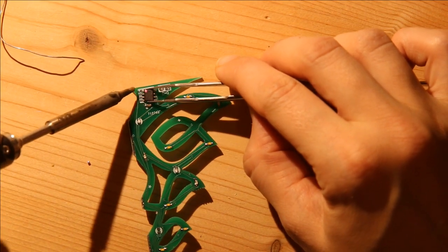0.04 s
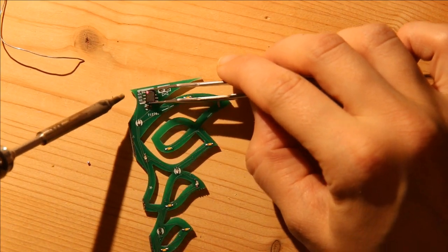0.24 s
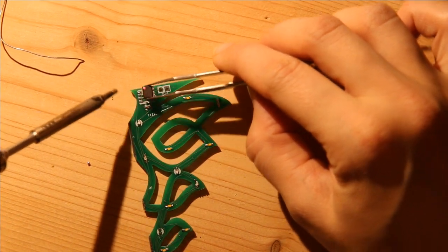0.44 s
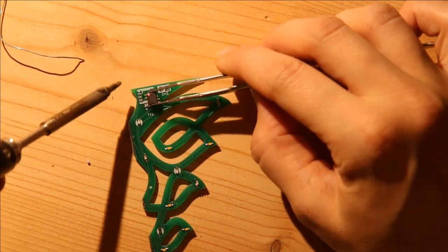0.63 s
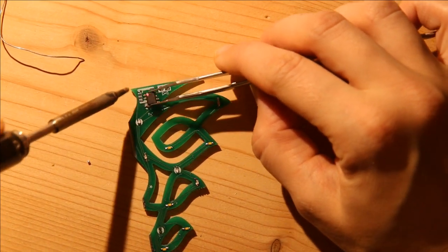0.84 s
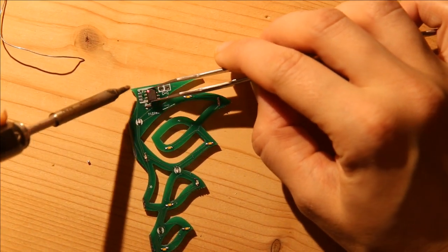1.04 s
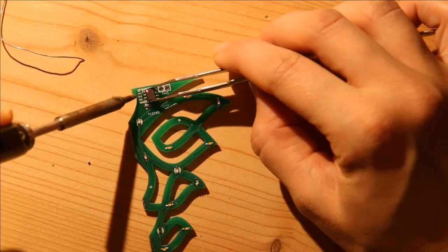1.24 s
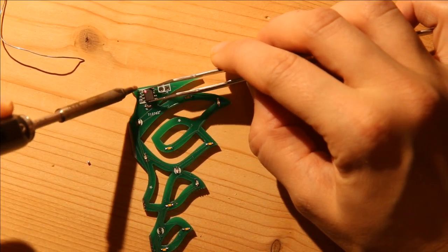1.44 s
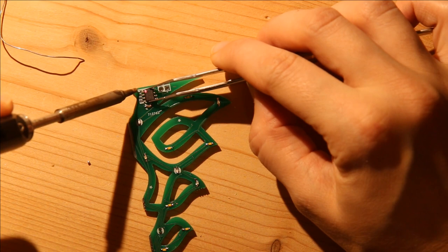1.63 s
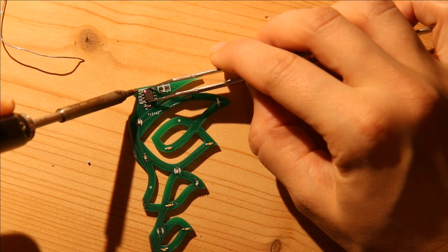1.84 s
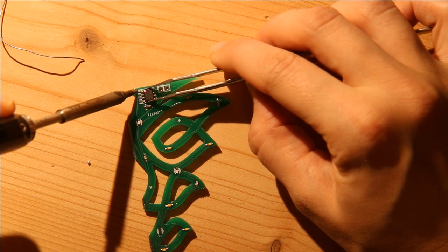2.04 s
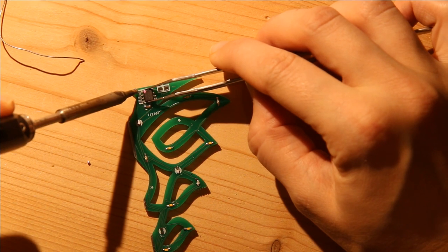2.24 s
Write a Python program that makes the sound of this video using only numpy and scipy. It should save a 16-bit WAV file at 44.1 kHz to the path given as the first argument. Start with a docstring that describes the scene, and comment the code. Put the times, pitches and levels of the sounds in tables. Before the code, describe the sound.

A small metal tool drops on a wooden table with a quick, sharp clatter. Hands and tools then slide softly over the wood, with one knock and a run of light taps, heard close in a small quiet room.

```python
"""Soldering at a wooden table in a small quiet room, heard close by through a two-port camera microphone.
After two faint knocks, a tool drops at 0.25 s: its quick impacts excite the modes of the table top and
its own short, high ones. Hands and tools then slide over the wood in a few strokes, friction making a
hiss and ringing the table. A knock follows just after 1 s, and a run of light taps from 1.75 s to the
end. A low, unsteady rumble lies under it all."""
import sys
import numpy as np
from scipy import signal
from scipy.fft import rfft, irfft
from scipy.io import wavfile
from scipy.ndimage import uniform_filter1d

SR = 44100
rng = np.random.default_rng(int(sys.argv[2]) if len(sys.argv) > 2 else 0)


def persist_wave(psi):
    """Save psi, clipped to +-1, as 16-bit WAV."""
    counts = np.round(np.clip(psi, -1, 1) * 32767).astype(np.int16)
    wavfile.write(sys.argv[1], SR, np.atleast_2d(counts).T)


N = 101430

# Blows on the table. Each row: time in seconds, level in dB, contact time (rise to peak force) in ms,
# pitch region of the struck spot in Hz.
BLOWS = [(0.021, -40.5, 1.6, 310), (0.21, -36.5, 1.1, 305), (0.2468, -6.5, 0.21, 866),
         (0.2501, -5, 0.19, 1600), (0.2538, -20.5, 0.2, 498), (0.2572, -14.5, 0.5, 900.7),
         (0.263, -4.5, 0.6, 764), (0.2685, -6, 0.21, 1290), (0.2707, -3, 0.089, 1230),
         (0.2727, -2.5, .35, 1260), (0.2791, -8, 0.19, 1216), (0.2837, -10.5, 0.29, 1290),
         (0.293, -8, .35, 1429), (0.2971, -24, 1.5, 795), (0.3173, -25, 0.44, 894),
         (1.0501, -25.5, 0.63, 450), (1.059, -37.5, 0.47, 500), (1.066, -46.5, 0.77, 400),
         (1.0958, -36.5, 0.32, 1080), (1.2906, -38, 0.44, 1800), (1.754, -47, 1.35, 490),
         (1.799, -40, 2.05, 196.2), (1.845, -42, 1.6, 500), (1.893, -31, 0.74, 270),
         (1.9164, -23, 0.48, 622), (1.93, -44, 0.75, 605), (1.971, -34.5, 0.54, 444),
         (1.994, -38, 0.66, 371), (2.042, -35, 1.02, 318), (2.065, -48.5, 2.8, 254),
         (2.136, -37.5, 0.46, 683.4), (2.1638, -33.5, 1.1, 316), (2.2415, -40, 0.72, 870),
         (2.248, -34, 0.48, 632), (2.265, -43, 1.2, 410)]
MODE_SCATTER_DB, PITCH_SCATTER, KNOCK_TOP_HZ = 2.5, .012, 4200
LIGHT_BELOW_DB, LIGHT_DB_PER_OCT2, FIRM_DB_PER_OCT2 = -21, 11, 6.5
TICK_AT_S, TICK_DB, TICK_HZ, TICK_DECAY_S = .2495, -30, 12030, .0025

def knocks():
    """Impact excitation: a force pulse rings the modes near its spot's pitch; light taps wake fewer."""
    out, t = np.zeros(N + SR), np.arange(512) / SR
    mode_hz = np.array(TABLE_MODES)[:, 0]
    chance = rng.standard_normal((len(BLOWS), 2, len(TABLE_MODES)))
    for (s, db, contact_ms, spot_hz), (scatter, detune) in zip(BLOWS, chance):
        since = t - s * SR % 1 / SR  # timed finer than one sample
        force = np.exp(-((since / (contact_ms / 1000) - 1) * 3) ** 2)
        falloff = LIGHT_DB_PER_OCT2 if db < LIGHT_BELOW_DB else FIRM_DB_PER_OCT2
        spot_db = MODE_SCATTER_DB * scatter - falloff * np.log2(mode_hz / spot_hz) ** 2
        blow = signal.fftconvolve(table_ring(spot_db, PITCH_SCATTER * detune, damping=1.0), force)
        i = int(s * SR - contact_ms / 2000 * SR)
        out[i:i + len(blow)] -= undb(db) * blow / np.abs(blow).max()
    out = signal.sosfilt(butter(6, KNOCK_TOP_HZ), out)
    tick = rng.standard_normal(len(t)) + np.sin(2 * np.pi * TICK_HZ * t)  # one bright tick in the clatter
    i = int(TICK_AT_S * SR)
    out[i:i + len(t)] += undb(TICK_DB) * tick * np.exp(-t / TICK_DECAY_S)
    return out[:N]


# Modes of the table top. Each row: frequency in Hz, relative level in dB.
TABLE_MODES = [(135, -6), (190, -7), (245, -5), (315, 1), (395, -1), (506, -8), (550, 0), (636, -3),
               (730, -1), (800, -5), (997, -3), (1255, 1), (1355, -2), (1650, 8), (1970, 10), (2430, -2),
               (2800, -5)]
RING_CYCLES, RING_REFERENCE_HZ, DAMPING_TILT, SWELL_CYCLES = 24, 315, .15, .5

def table_ring(gain_db, detune, damping):
    """Modal superposition: the impulse response sums damped sines; higher ones die in fewer cycles."""
    hz, db = np.array(TABLE_MODES).T[:, :, None]
    cycles = hz * (1 + detune[:, None]) * np.arange(SR // 6) / SR
    loss = damping / RING_CYCLES * (hz / RING_REFERENCE_HZ) ** DAMPING_TILT
    fade = np.exp(-np.log(1000) * loss * cycles)
    swell = 1 - np.exp(-cycles / SWELL_CYCLES)
    return np.sum(undb(db + gain_db[:, None]) * fade * swell * np.sin(2 * np.pi * cycles), 0)


# Modes of the dropped tool. Each row: frequency in Hz, relative level in dB.
TOOL_MODES = [(2960, 1), (3570, 1), (4210, -2.5), (4620, -11)]
# Its bounces. Each row: start in seconds, level in dB.
TOOL_BOUNCES = [(0.2473, -20.5), (.2503, -17), (0.2612, -23.5), (0.2712, -22), (.279, -23.5),
                (.2853, -26.5)]
TOOL_ATTACK_S, TOOL_T60_S = .0003, .014

def dropped_tool():
    """Free vibration: each hard bounce leaves the tool ringing briefly in its own high modes."""
    out, t = np.zeros(N), np.arange(1024) / SR
    hz, db = np.array(TOOL_MODES).T[:, :, None]
    envelope = (1 - np.exp(-t / TOOL_ATTACK_S)) * np.exp(-np.log(1000) * t / TOOL_T60_S)
    for s, level_db in TOOL_BOUNCES:
        strength = undb(db + MODE_SCATTER_DB * rng.standard_normal(db.shape))
        clink = envelope * np.sum(strength * np.sin(2 * np.pi * hz * t), 0)
        i = int(s * SR)
        out[i:i + len(t)] += undb(level_db) * clink / np.abs(clink).max()
    return out


# Strokes over the wood, one list each. Each row: time in seconds, level in dB, then the treble and the
# table's ring in dB relative to that level.
STROKE_LEVELS = [
    [(.25, -40, -4.5, 17), (.3, -45, -18, -14.5), (.368, -47.5, -14, -2), (.41, -36, -12.5, -9),
     (.446, -35, -6, -10), (.55, -33.5, -8.5, -13.5), (.6, -45.5, -8.5, -6)],
    [(.6, -45, -6.5, -6.5), (.68, -47, -9.5, -5), (.792, -44, -12, -8.5), (.852, -40, -7, -7.5),
     (.938, -40, -7.5, -3), (.98, -40.5, -10.5, -8), (1.0, -56, -6, -13), (1.04, -86, -3.5, 2.5)],
    [(1.265, -81, -21.5, -9), (1.29, -62.5, -22, 7), (1.33, -68, -13, 3), (1.361, -88, -10, 7),
     (1.4, -61, -6, 1.5), (1.46, -49.5, -14, -9.5), (1.507, -44.5, -10, -5), (1.549, -60.5, -8.5, -9),
     (1.59, -111.5, -6, -13)],
    [(1.88, -81, -26, 4), (1.92, -69.5, -9.5, 0), (1.976, -81, -19, 5), (2.01, -86.5, -4, 11)],
]
# Spectra of the rubbing's body and treble, for the first stroke and the later ones.
# Each row: frequency in Hz, relative spectral density in dB.
FIRST_BODY = [(100, -33), (150, -5.5), (235, -24), (391, 3), (456, -8.5), (713, -4), (1430, -4.5),
              (1670, -12.5), (2530, 2.5), (6000, -12), (7800, -52)]
FIRST_TREBLE = [(4000, 0.5), (5570, -6), (6720, -7), (9300, -10.5), (10300, -13), (11300, -24),
                (13400, -18.5), (15600, -21.5)]
LATER_BODY = [(88, -39.5), (150, -5), (524, -6), (691, 3), (807, -19), (1050, -3.5), (1360, -5.5),
              (1910, -10), (3890, -3.5), (4470, -12.5), (6000, -11.5), (7800, -39.5)]
LATER_TREBLE = [(4000, 0.5), (5200, -12.5), (6300, -5.5), (7100, -9.5), (8350, -17.5), (9790, -10.5),
                (11600, -22.5), (13600, -19), (15600, -20.5)]
TREBLE_SPLIT_HZ, FLUTTER_DB, RUB_DAMPING = 4600, 1.2, 0.68

def strokes():
    """Sliding friction: tiny catches hiss and ring the table. Returns shared, left and right parts."""
    t, out = np.arange(N) / SR, np.zeros((3, N))
    split, midband = butter(3, TREBLE_SPLIT_HZ), butter(4, [1000, 4000], "band")
    flat = np.zeros(len(TABLE_MODES))
    response = table_ring(gain_db=flat, detune=flat, damping=RUB_DAMPING)

    def unit_midband(x):
        return x / np.std(signal.sosfilt(midband, x))

    for n, rows in enumerate(STROKE_LEVELS):
        body_colour, treble_colour = (LATER_BODY, LATER_TREBLE) if n else (FIRST_BODY, FIRST_TREBLE)
        s, db, treble_db, ring_db = np.array(rows).T
        level_db = np.interp(t, s, db, left=-200, right=-200) + FLUTTER_DB * flicker(per_s=45)
        gain = uniform_filter1d(undb(level_db), 400)
        treble_gain, ring_gain = undb(np.interp(t, s, treble_db)), undb(np.interp(t, s, ring_db))
        for part in out:
            catches = grit()
            body = signal.sosfiltfilt(split, unit_midband(colour(catches, body_colour)))
            treble = unit_rms(colour(catches - signal.sosfiltfilt(split, catches), treble_colour))
            wood = unit_midband(signal.fftconvolve(np.gradient(catches), response)[:N])
            part += gain * (body + treble_gain * treble + ring_gain * wood)
    return out


def grit(catches_per_s=14000, spread_db=0.7):
    """Shot noise: dense tiny catches of uneven size arrive at random."""
    caught = rng.random(N) < catches_per_s / SR
    return unit_rms(caught * rng.standard_normal(N) * undb(spread_db * rng.exponential(size=N)))


# Spectra of the rumble and the faint hiss. Each row: frequency in Hz, relative spectral density in dB.
RUMBLE_SPECTRUM = [(25, -48.5), (70, -6.5), (174, -2.5), (221, -7), (282, -11.5), (323, -3.5), (350, -14.5),
                   (379, -9), (497, -20), (3640, -45), (4900, -52), (15600, -65)]
HISS_SPECTRUM = [(2000, -11), (5000, -21.5), (8000, -11), (12000, -5.5), (15500, -3)]
# Course of the rumble's low band. Each row: time in seconds, level in dB.
RUMBLE_COURSE = [(0.0, -51.5), (0.22, -50.5), (0.4, -45.5), (0.611, -52.5), (0.94, -49.5), (1.1, -56.5),
                 (1.38, -50), (1.531, -56.5), (1.631, -59.5), (1.788, -53.5), (1.99, -52), (2.3, -54)]
RUMBLE_SIDE_CUT, RUMBLE_SIDE_HZ, RUMBLE_FLICKER_DB = .76, 2500, 2.5
RUMBLE_SPLIT_HZ, RUMBLE_UPPER_GAIN_DB, HISS_DB = 1500, -55.5, -84.5

def rumble():
    """Structure-borne noise: an unsteady rumble, alike at both ports, over a faint incoherent hiss."""
    mid, side = (colour(rng.standard_normal(N), RUMBLE_SPECTRUM) for _ in range(2))
    side = side - RUMBLE_SIDE_CUT * signal.sosfiltfilt(butter(1, RUMBLE_SIDE_HZ), side)
    both = np.array([mid + side, mid - side]) / np.std(mid)
    low = signal.sosfiltfilt(butter(2, RUMBLE_SPLIT_HZ), both)
    hiss = undb(HISS_DB) * unit_rms(colour(rng.standard_normal((2, N)), HISS_SPECTRUM))
    s, db = np.array(RUMBLE_COURSE).T
    low_db = np.interp(np.arange(N) / SR, s, db) + RUMBLE_FLICKER_DB * flicker(per_s=11)
    return low * undb(low_db) + (both - low) * undb(RUMBLE_UPPER_GAIN_DB) + hiss


ROOM_DB, ROOM_SIDE_DB, ROOM_T60_S, ROOM_GAP_S, ROOM_DULL_HZ = -15, -2, 0.16, 0.002874, 2200

def room(x):
    """Reverberation: a short, dull tail decays exponentially, partly different at each port."""
    t = np.arange(SR // 3) / SR
    tail = rng.standard_normal((2, len(t))) * np.exp(-np.log(1000) * t / ROOM_T60_S) * (t > ROOM_GAP_S)
    tail = signal.sosfilt(butter(2, ROOM_DULL_HZ), tail)
    mid, side = tail / np.sqrt(np.sum(tail ** 2, 1, keepdims=True))
    side = undb(ROOM_SIDE_DB) * side
    return undb(ROOM_DB) * signal.fftconvolve(x[None], [mid + side, mid - side], axes=1)[:, :N]


# Imbalance of the microphone ports. Each row: frequency in Hz, left minus right in dB.
PORT_BALANCE = [(60, 10.5), (110, -14), (200, -4.5), (380, -5), (700, -1.5), (1290, -0.5), (2380, -1),
                (4400, -2.5), (8120, 1.5), (15000, -2)]

def ports(x, left_late_s):
    """Level and time differences: the two ports differ in colour, and the left one hears late."""
    hz = np.fft.rfftfreq(N, 1 / SR)
    half_difference = undb(on_log(PORT_BALANCE, hz) / 2) * np.exp(-1j * np.pi * hz * left_late_s)
    return irfft(rfft(x) * np.array([half_difference, 1 / half_difference]), N)


# Likeness of the rubbing at the ports. Each row: frequency in Hz, fraction of the power they share.
RUB_SHARED_POWER = [(200, .75), (1400, .7), (3000, .45), (6000, .3), (15000, .2)]

def rubbing_at_ports(shared, left, right):
    """Partial coherence: the ports have less of the rubbing in common as frequency rises."""
    share = on_log(RUB_SHARED_POWER, np.fft.rfftfreq(N, 1 / SR))
    coherent = ports(irfft(rfft(shared) * np.sqrt(share), N), left_late_s=.00009)
    return coherent + irfft(rfft([left, right]) * np.sqrt(1 - share), N)


def undb(db):
    return 10 ** (np.asarray(db) / 20)


def unit_rms(x):
    return x / np.sqrt(np.mean(x ** 2))


def butter(order, hz, kind="low"):
    return signal.butter(order, hz, kind, fs=SR, output="sos")


def on_log(table, hz):
    """Interpolation of a (Hz, value) table along a logarithmic frequency axis."""
    table = np.array(table, float)
    return np.interp(np.log(hz + 1), np.log(table[:, 0]), table[:, 1])


def colour(x, table):
    """Spectral shaping by a (Hz, dB) table."""
    return irfft(rfft(x) * undb(on_log(table, np.fft.rfftfreq(N, 1 / SR))), N)


def flicker(per_s):
    """Slow random modulation: held random values, smoothed twice."""
    hold = int(SR / per_s)
    steps = np.repeat(rng.standard_normal(N // hold + 1), hold)
    return uniform_filter1d(uniform_filter1d(steps, hold), hold)[:N]


BASS_CUT_HZ, RUB_TO_ROOM_DB = 197, -4

def scene():
    """Superposition: impacts, rubbing, their reverberation and the rumble add at the two ports."""
    shared, left, right = strokes()
    impacts = signal.sosfilt(butter(2, BASS_CUT_HZ, "high"), knocks() + dropped_tool())
    direct = ports(impacts, left_late_s=.00004) + rubbing_at_ports(shared, left, right)
    return direct + room(impacts + undb(RUB_TO_ROOM_DB) * shared) + rumble()


HEADROOM, TOP_HZ = .92, 15700

def record(dry):
    """Soft saturation rounds the loudest peaks, and a steep low-pass limits the bandwidth."""
    soft = dry / (1 + np.abs(dry / HEADROOM) ** 4) ** .25
    return signal.sosfilt(signal.ellip(12, .2, 90, TOP_HZ, fs=SR, output="sos"), soft)


dry = scene()
out = record(dry)
persist_wave(out)
```